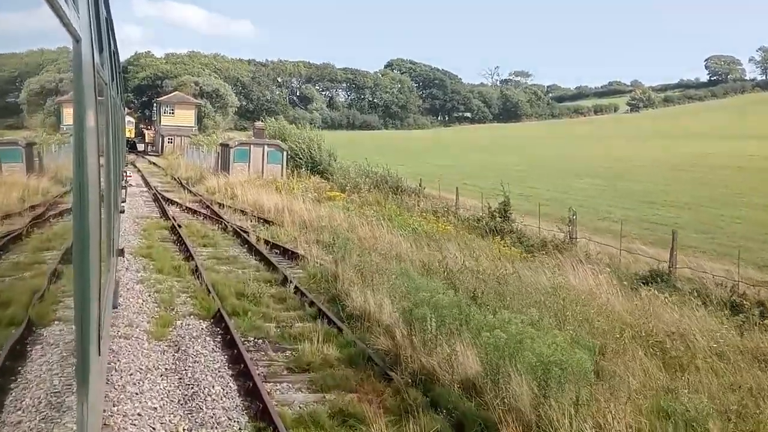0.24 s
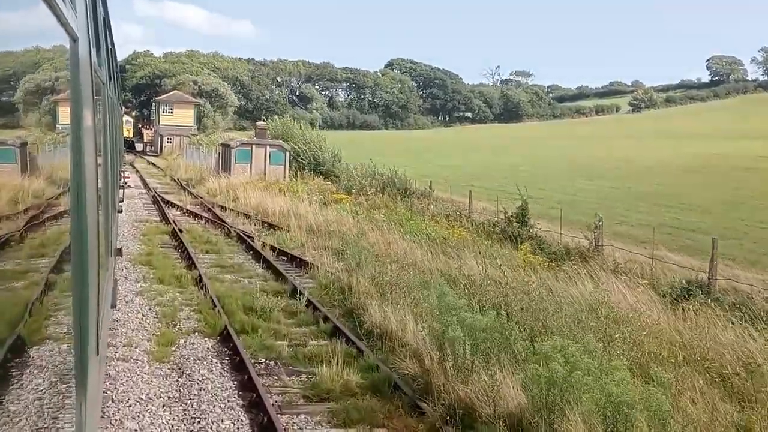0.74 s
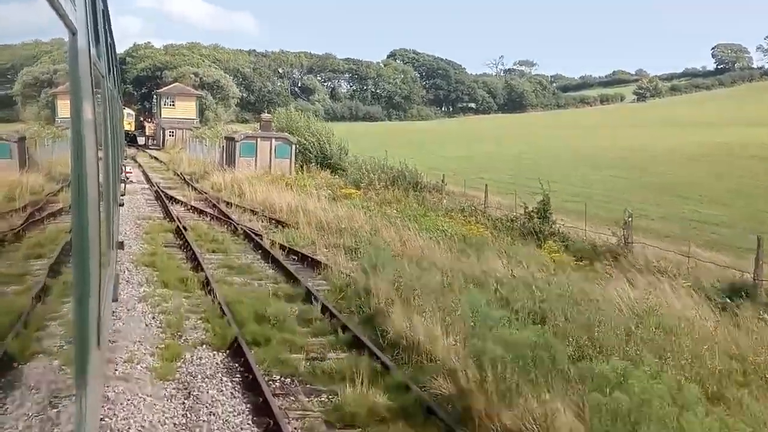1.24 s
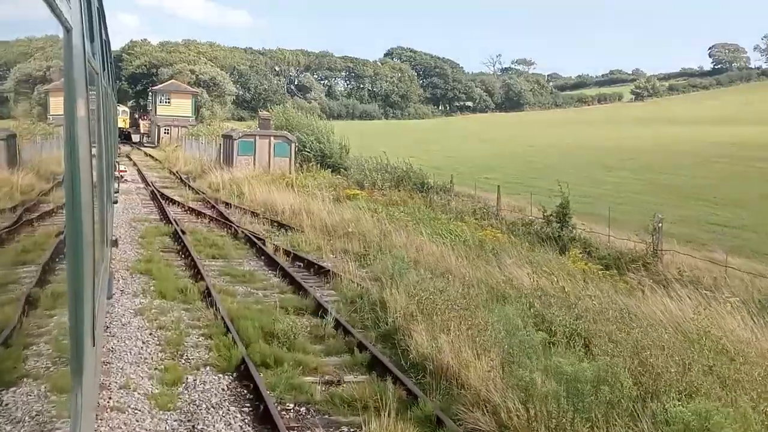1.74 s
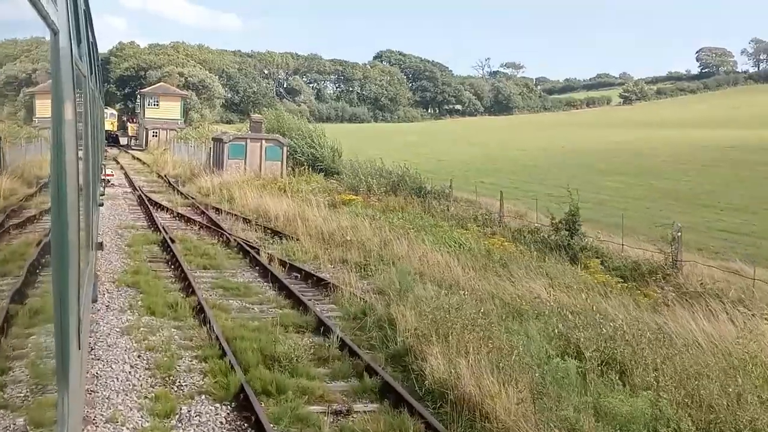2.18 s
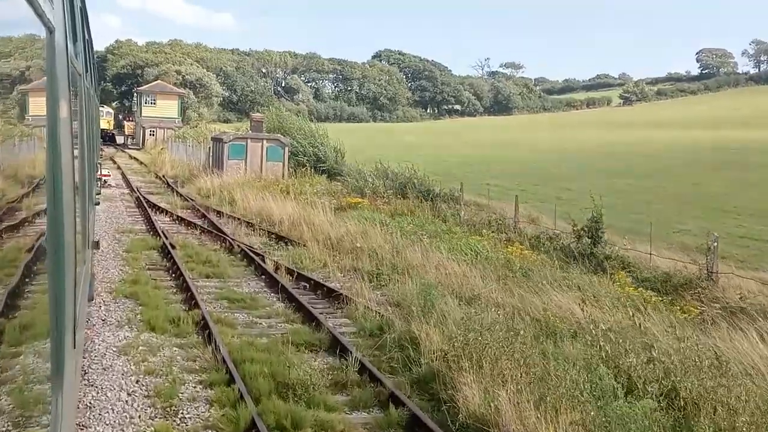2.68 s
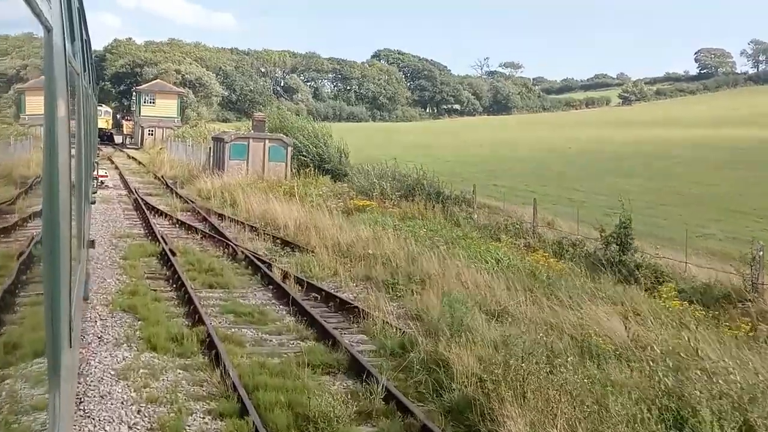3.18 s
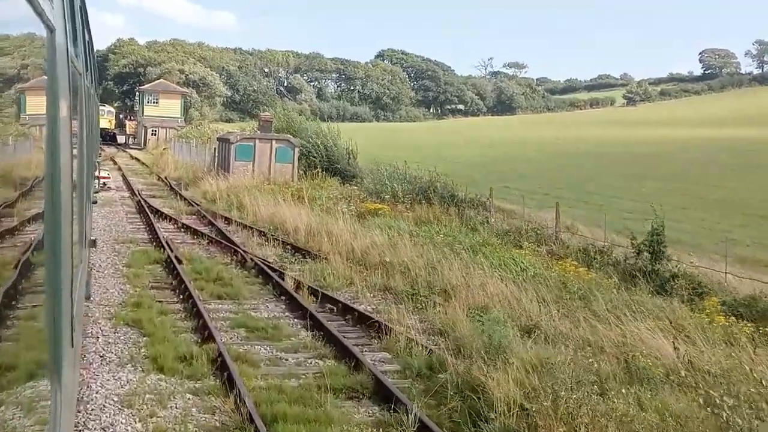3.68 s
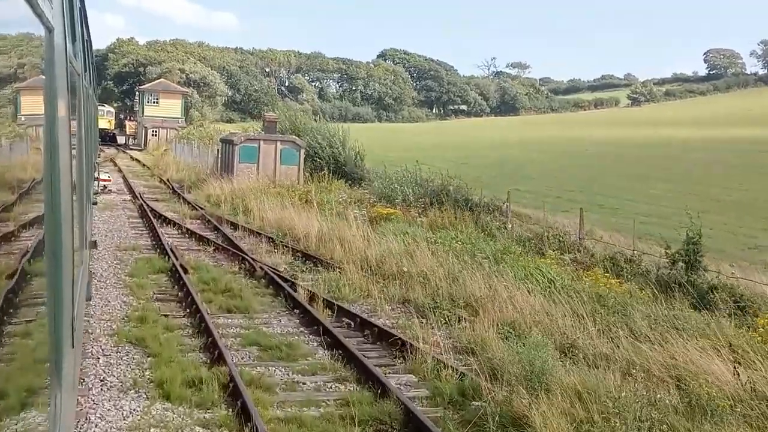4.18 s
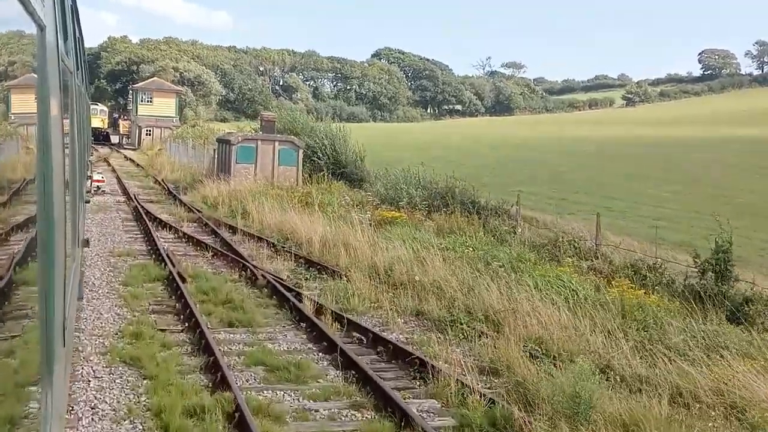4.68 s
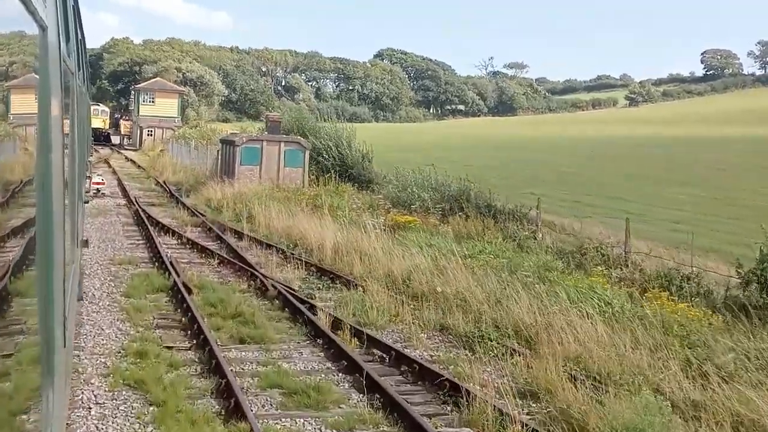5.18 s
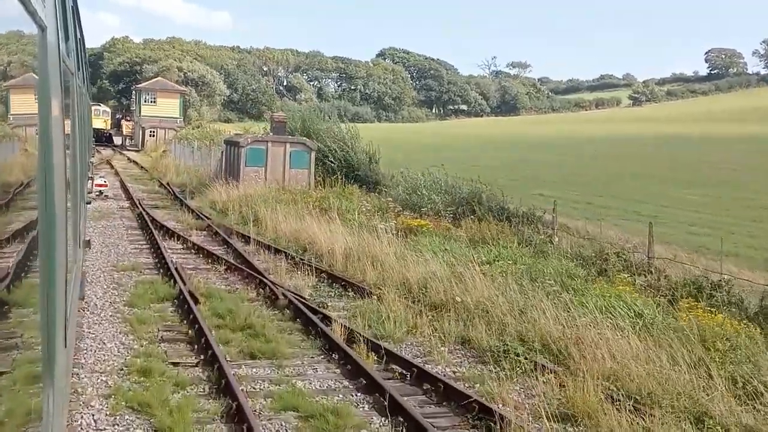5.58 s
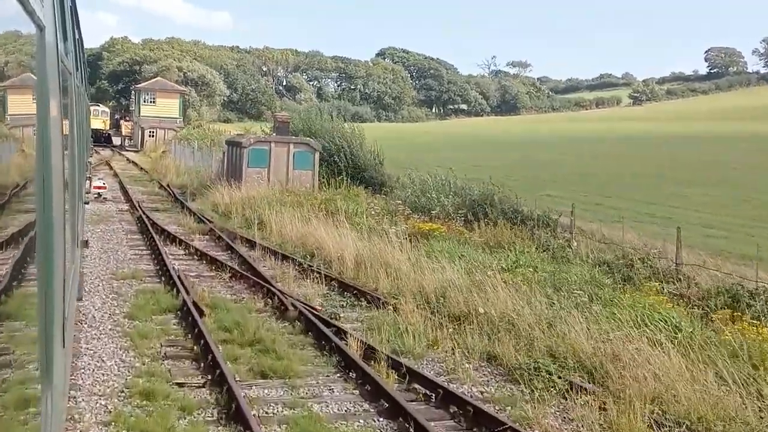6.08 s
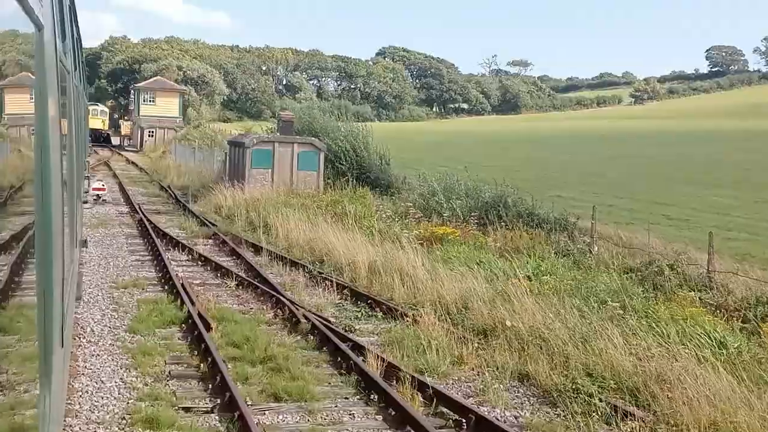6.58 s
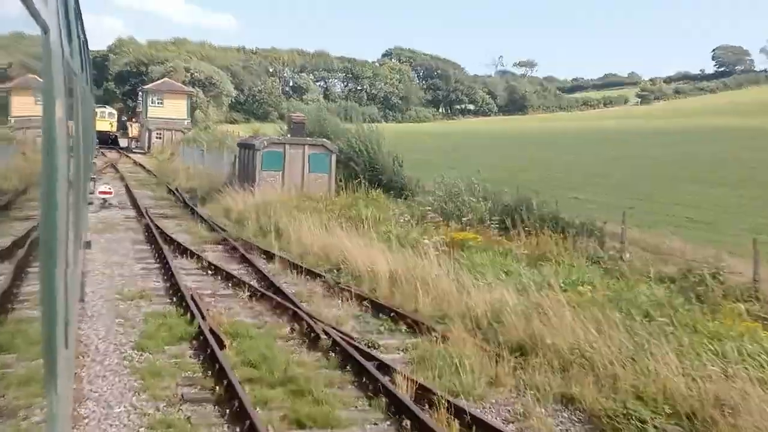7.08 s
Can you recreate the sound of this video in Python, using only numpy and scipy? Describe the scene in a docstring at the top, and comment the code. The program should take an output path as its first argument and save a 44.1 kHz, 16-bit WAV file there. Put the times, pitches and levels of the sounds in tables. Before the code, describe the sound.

A passenger coach rolls slowly on jointed rails, heard from a microphone held out of a window in the moving air. A steady rushing hiss from the wheels runs throughout, with a faint metallic ringing that flickers in short spurts. For the first two seconds the wind is a deep, moderate rumble with a few soft puffs. At about 2.4 seconds the wheels clank over a joint with a thud. Strong gusts then buffet and pop on the microphone from about 2.7 to 4.5 seconds, with another clatter at 3.5 seconds. After a brief lull, a quick cluster of clanks comes at 5.2 to 5.4 seconds as the wind surges again. A faint squeak and a lighter knock follow near 6 seconds. A last run of clatters falls between 6.6 and 6.9 seconds under heavy gusts, and the wind eases just after 7 seconds.

```python
"""Wind buffets the microphone over the hiss of wheels: a passenger coach rolling slowly on jointed
rails, heard from one microphone held out of a window, right in the slipstream. Eddies press on it
in gusts, puffs and pops above a deep rumble. From the track below, rail roughness hisses and sets
the wheels humming in their own modes; they clatter over the joints and knock, ping or squeak."""
import sys
import numpy as np
from scipy import signal
from scipy.fft import rfft, irfft, next_fast_len
from scipy.io import wavfile
from scipy.ndimage import uniform_filter1d, map_coordinates

SR = 44100
rng = np.random.default_rng(int(sys.argv[2]) if len(sys.argv) > 2 else 0)


def dump(signal):
    """Clip the signal to [-1, 1] and save it as 16-bit WAV at the path in sys.argv[1]."""
    limited = np.clip(np.atleast_2d(signal).T, -1, 1)
    pcm = np.round(limited * 32767).astype(np.int16)
    wavfile.write(sys.argv[1], SR, pcm)


N = 323681

# The wheels' running level along the track: time_s, roll_db, hiss_db, singing_offset_db
ROLLING_LEVELS = [(0, -44.5, -66.5, 2), (.9, -45, -65, 2.5), (1.7, -44, -65, 2.5), (2.8, -44.5, -67, 0.5),
                  (3.3, -43, -63.5, 1), (4.05, -44.5, -65, -0.5), (4.6, -43.5, -65, -3),
                  (5.4, -45, -66.5, 0), (6.4, -45, -64.5, 1.5), (7.34, -45.5, -66, -7)]
# The fainter wheel modes: pitch_hz, width_hz, level_db
FAINT_MODES = [(1840, 150, -59.5), (2404, 26, -65.5), (2615, 41, -65), (2766, 29, -65), (3104, 32, -64.5),
               (3460, 18, -72.5), (4330, 200, -66), (5270, 50, -76), (5740, 55, -78), (5860, 40, -86),
               (6950, 60, -81.5), (10350, 120, -78.5), (11150, 70, -83.5), (11600, 70, -88)]
# The three clearest wheel modes: pitch_hz, width_hz, level_db
SINGING_MODES = [(1353, 35, -59.5), (1994, 53, -55.5), (3800, 74, -64)]


def amp(db):
    """Gain of a level in dB."""
    return 10 ** (np.asarray(db) / 20)


def unit(x):
    """x at rms 1."""
    return x / np.sqrt(np.mean(x ** 2) + 1e-20)


def curves(rows):
    """One value per sample for each column after the time."""
    times, *columns = np.transpose(rows)
    return [np.interp(np.arange(N) / SR, times, column) for column in columns]


def wobble(rate):
    """A smooth random curve, rate knots a second."""
    knots = rng.standard_normal(int(N * rate / SR) + 4)
    return map_coordinates(knots, [np.arange(N) * rate / SR])


def filtered(x, response):
    """x through a filter whose gain is response(hz)."""
    size = next_fast_len(len(x) + 8192)
    return irfft(rfft(x, size) * response(np.fft.rfftfreq(size, 1 / SR)), size)[:len(x)]


def rush(spectrum, patchy_db, count=N):
    """Noise of rms 1 with patches of random gain, coloured by (freq_hz, level_db) points."""
    bins = signal.stft(rng.standard_normal(count + 512), nperseg=512)[2]
    patches = uniform_filter1d(rng.standard_normal(bins.shape), size=4, axis=0)
    patches = uniform_filter1d(patches, size=12, axis=1)
    noise = signal.istft(bins * amp(patchy_db * unit(patches)), nperseg=512)[1][:count]
    freq_hz, level_db = np.transpose(spectrum)
    return unit(filtered(noise, lambda f: amp(np.interp(np.log1p(f), np.log1p(freq_hz), level_db))))


def hum(hz, width_hz):
    """Noise in one narrow mode, rms 1."""
    return unit(filtered(rng.standard_normal(N), lambda f: 1 / (1 + ((f - hz) / width_hz) ** 2)))


def resonances(modes):
    """The gain of (pitch_hz, width_hz, gain_db) modes as a function of frequency."""
    return lambda f: np.sqrt(sum(amp(2 * db) / (1 + ((f - hz) / width_hz * 2) ** 2)
                                 for hz, width_hz, db in modes))


def swell(t, rise_s, t60_s):
    """A soft rise into an exponential fall, peak 1."""
    shape = (1 - np.exp(-t / max(rise_s, 1e-4))) * amp(-60 * t / max(t60_s, .005))
    return shape / shape.max()


def add(track, start_s, x):
    """Mix x into track from start_s."""
    part = track[round(start_s * SR):][:len(x)]
    part += x[:len(part)]


def humps(centres_s, lengths_s, levels_db, lean=1):
    """Summed power of rounded swells; with lean over 1 they build more slowly than they drop."""
    power = np.zeros(N)
    for centre_s, length_s, db in zip(centres_s, np.maximum(lengths_s, .02), levels_db):
        u = np.linspace(0, 1, int(length_s * SR))
        add(power, centre_s - length_s / 2, amp(2 * db) * np.sin(np.pi * u ** lean) ** 2)
    return power


def rail_hiss():
    """Wheels on rough rail, below the window: a broad rush and a high hiss that waver together."""
    # The rolling contact: freq_hz, level_db
    contact_spectrum = [(180, -2.5), (300, -2.5), (373, -12.5), (453, -0.5), (502, -5), (711, -6.5),
                        (1030, -11), (1390, -12), (1700, -14.5), (2020, -14.5), (2120, -11.5), (3740, -18),
                        (6500, -34.5), (8450, -76), (14300, -120)]
    # Its high hiss: freq_hz, level_db
    hiss_spectrum = [(3240, -18), (5500, -9), (5890, -8.5), (6170, -5), (7110, -6), (7670, -8.5),
                     (8570, -7.5), (9300, -2.5), (10000, 0), (10350, -6.5), (10800, -9), (12800, -13.5),
                     (14800, -13.5), (15300, -20.5)]
    roll_db, hiss_db, _ = curves(ROLLING_LEVELS)
    shake = wobble(6)
    contact = amp(roll_db + 0.1 * shake) * rush(contact_spectrum, patchy_db=2.0)
    hiss = amp(hiss_db + 0.34 * shake + 0.4 * wobble(9)) * rush(hiss_spectrum, patchy_db=1.6)
    return contact + hiss


def wheel_hum(spurt_s=0.08):
    """Rail roughness drives the wheel modes: the faint ones waver, the clearest sing in spurts."""
    # Flare-ups, each in the singing mode near its pitch: centre_s, pitch_hz, level_db
    spurts = [(.49, 1985, -46.5), (.59, 1985, -48), (.82, 1360, -51), (.82, 1985, -51), (.96, 1985, -46),
              (1.08, 1985, -52), (1.2, 1985, -52), (1.35, 1985, -52), (1.2, 3820, -56.5), (1.64, 1360, -48),
              (1.94, 1985, -51), (2.11, 1985, -54), (2.43, 1360, -46), (3.13, 1360, -54), (3.17, 3820, -55),
              (3.31, 1985, -49), (3.58, 1985, -43), (3.88, 3820, -54), (4.09, 1985, -51), (4.62, 1360, -55),
              (5.21, 1360, -42), (5.23, 1985, -46), (6.58, 1360, -41.5), (6.85, 1360, -46),
              (7.07, 1985, -48.5)]
    roll_db, _, singing_db = curves(ROLLING_LEVELS)
    track = np.zeros(N)
    for hz, width_hz, db in FAINT_MODES:
        waver_db = 2.2 * wobble(2.2) + 2.6 * wobble(14)
        track += amp(db + roll_db - roll_db.mean() + waver_db) * hum(hz, width_hz)
    for hz, width_hz, db in SINGING_MODES:
        own_spurts = [row for row in spurts if abs(np.log2(row[1] / hz)) < .25]
        centres_s, _, flare_db = np.transpose(own_spurts)
        flare_power = humps(centres_s, np.full(len(centres_s), spurt_s), flare_db)
        flicker = amp(db + singing_db) * unit(amp(1.9 * wobble(25) + 1.6 * wobble(8.3)))
        track += np.sqrt(flicker ** 2 + flare_power) * hum(hz, width_hz)
    return track


def rail_joints(rise_s=0.016, clank_db=-6.5, crack_db=-15.5):
    """Each gap shakes loose steel: a crack, a clatter, its clank in the wheel, a thud in the frame."""
    # A wheel over a gap: start_s, clatter_db, thud_offset_db, tilt_db_per_octave, t60_s
    gaps = [(2.4054, -41.5, 13.5, -2.5, 0.22), (2.4212, -42, -16, -3, 0.19), (3.129, -53, 4, -8, .2),
            (3.25, -50.5, -2, -10, 0.27), (3.547, -40.5, 10.5, -2, 0.17), (4.59, -53, -2, 2, .2),
            (5.1994, -40, 8.5, -2, 0.15), (5.265, -50, 13.5, 4, .14), (5.3178, -42.5, -2, -17, 0.2),
            (5.389, -53, 11.5, -17, 0.18), (5.9694, -47, -14, -4, .19), (6.57, -40.5, 5.5, -5.5, 0.2),
            (6.6394, -59, 0, -11, .16), (6.6994, -47, 0, -9, 0.52), (6.7555, -44, -15, -8, 0.47),
            (6.8234, -38.5, 10.5, -5.5, 0.15), (6.9048, -53.5, 13.5, -14, 0.39)]
    # Loose steel shaking: freq_hz, level_db
    clatter_spectrum = [(470, -33), (800, -12), (1230, -6), (1400, -6.5), (1630, -5.5), (1850, -14),
                        (2240, -9), (3740, -18.5), (8000, -44.5), (10400, -80), (17600, -120)]
    # Steel on steel at the blow: freq_hz, level_db
    crack_spectrum = [(2000, -30), (3200, 1), (6000, -7), (8500, -40)]
    # The frame under the coach: pitch_hz, width_hz, gain_db
    frame_modes = [(487, 220, -0.5), (562, 67, 7), (730, 45, 2), (900, 89, -9)]
    # The push on that frame: freq_hz, level_db
    thud_spectrum = [(300, -40), (430, -1.5), (1100, 5), (1500, -45)]
    track, t = np.zeros(N), np.arange(SR // 2) / SR
    for start_s, db, thud_db, tilt, t60_s in gaps:
        tilted = [(hz, level + tilt * np.log2(hz / 2000)) for hz, level in clatter_spectrum]
        clatter = rush(tilted, patchy_db=2.5, count=len(t))
        modes = [(hz, 1.6 * width, rng.normal(0, 3)) for hz, width, _ in FAINT_MODES + SINGING_MODES]
        clank = filtered(clatter, resonances(modes))
        thud = filtered(rush(thud_spectrum, patchy_db=1.1, count=len(t)), resonances(frame_modes))
        crack = rush(crack_spectrum, patchy_db=2.0, count=len(t))
        add(track, start_s, amp(db + crack_db) * swell(t, rise_s / 2, t60_s=.09) * crack)
        shape = swell(t, rise_s, t60_s)
        for noise, offset_db in (clatter, 0), (clank, clank_db), (thud, thud_db):
            burst = shape * noise
            burst *= np.linalg.norm(shape) / np.linalg.norm(burst)  # the blow sets the energy
            add(track, start_s, amp(db + offset_db) * burst)
    return track


def short_tones():
    """Wind pops on the microphone, and knocks, pings and squeaks from the wheels."""
    # One tone a row: start_s, level_db, pitch_hz, glide_hz_per_s, width_hz, rise_s, t60_s
    tones = [(0.02, -47, 2630, 2, 87, 0.035, 0.45), (0.45, -24.5, 238, 0, 27, 0.0018, 0.074),
             (0.48, -37, 450, -2, 40, .003, 0.11), (0.78, -44.5, 2470, 2, 39, 0.012, 0.22),
             (1.08, -68, 5860, 3, 22, 0.1, 1.6), (1.74, -33, 297, -3, 51, 0.0034, 0.073),
             (2.002, -61, 5340, 0, 54, 0.08, .7), (2.251, -65, 5360, 10, 40, .08, 1.2),
             (2.44, -62, 5350, 0, 35, .08, .8), (2.406, -20, 507, -8, 22, 0.0048, 0.061),
             (2.522, -34, 1980, -3, 47, 0.0034, 0.052), (2.862, -19.5, 462, -3, 9.4, 0.0022, 0.04),
             (3.521, -17.5, 327, 2, 13, 0.0026, 0.058), (3.883, -41, 4440, 0, 970, .001, 0.03),
             (4.11, -39.5, 3370, 0, 6.7, 0.012, 0.16), (4.175, -48, 3360, 0, 10, .01, .1),
             (4.96, -44, 2360, 20, 33, .01, 0.1), (5.199, -34, 1857, 2, 55, 0.0034, 0.15),
             (5.285, -44, 3300, 8, 220, 0.0092, 0.16), (5.88, -52, 4500, -2500, 150, 0.037, 0.42),
             (5.62, -71, 5730, 0, 27, .1, 1.5), (5.95, -38, 598, -4, 18, 0.056, 1.2),
             (6.407, -32, 505, 0, 45, .002, 0.035), (6.758, -25, 306, 3, 18, 0.0086, 0.17),
             (6.93, -49, 1022, 3, 23, 0.052, 0.94)]
    track, t = np.zeros(N), np.arange(SR // 2) / SR
    fade = np.cos(np.pi * t)  # closes long tones at half a second
    for start_s, db, hz, glide, width_hz, rise_s, t60_s in tones:
        # the phase wanders: the wider the tone, the closer to a tick or a scrape
        drift = np.cumsum(rng.normal(0, np.sqrt(2 * np.pi * abs(width_hz) / SR), len(t)))
        tone = np.sin(2 * np.pi * (hz + glide * t / 2) * t + uniform_filter1d(drift, size=12))
        add(track, start_s, amp(db) * swell(t, rise_s, t60_s) * fade * tone)
    return track


def wind_gains(fast_offset_db=-5):
    """Gains of slow eddies, fast eddies and deep rumble: the stream past the window plus its gusts."""
    # The slipstream between gusts: time_s, buffet_db, rumble_db
    stream = [(0, -43.5, -38), (.7, -42, -45.5), (1.3, -42.5, -37.5), (1.8, -41.5, -40), (2.3, -39.5, -39),
              (2.7, -35.5, -34), (3.1, -32.5, -33), (3.6, -36, -32), (4.02, -42.5, -38), (4.4, -36.5, -35),
              (4.75, -35, -37.5), (5.1, -36, -41), (5.5, -29, -32.5), (5.9, -27, -28.5), (6.22, -35.5, -43),
              (6.45, -25.5, -29.5), (6.75, -34, -31), (7.05, -37, -32), (7.34, -43, -31.5)]
    # Single gusts: centre_s, length_s, buffet_db, fast_offset_db, rumble_db
    gusts = [(0.182, 0.062, -30.5, -23, -42), (0.492, 0.14, -43, 4, -32), (0.974, 0.064, -57, -4, -35),
             (1.288, 0.074, -35, -6, -34), (1.74, .12, -43.5, 2.5, -33), (1.932, 0.092, -34.5, -22, -26.5),
             (2.107, 0.13, -40.5, -1.5, -27), (2.42, 0.11, -26, -5, -36), (2.486, 0.051, -32, -27, -46),
             (2.683, 0.06, -29, -5.5, -40), (2.816, .14, -19, -5, -23), (2.868, 0.044, -16, -6.5, -34),
             (2.922, 0.076, -30, -0.5, -38), (2.98, 0.083, -22.5, -8.5, -41),
             (3.128, .15, -21.5, -6.5, -35), (3.27, 0.12, -25, -8, -24.5), (3.386, 0.099, -28, -10, -27),
             (3.553, 0.13, -23, -0.5, -39), (3.698, 0.062, -21.5, -3.5, -31),
             (3.883, 0.053, -31.5, -18, -28.5), (4.126, 0.12, -35, -4, -31.5),
             (4.181, 0.099, -25.5, -2, -42), (4.249, 0.14, -21.5, -1, -49), (4.335, 0.12, -22.5, -9, -36),
             (4.418, 0.17, -29, -6.5, -28), (4.53, 0.049, -33, -23, -45), (5.023, 0.11, -36, -17, -28),
             (5.234, .17, -26, -2, -34), (5.377, 0.093, -22, -5, -19.5), (5.493, 0.067, -38, 4.5, -30.5),
             (5.612, 0.056, -36, -18, -39), (5.705, 0.11, -26.5, -6, -28.5), (5.933, 0.11, -23, -16, -26),
             (6.006, 0.18, -24.5, 0.5, -37), (6.328, 0.058, -25, -7.5, -27.5), (6.476, 0.18, -21, -4, -36),
             (6.575, .06, -24.5, -2.5, -33), (6.694, 0.15, -33, -2, -31), (6.84, .07, -22, 4, -34),
             (6.89, .12, -21, -4, -24.5), (7.042, 0.063, -44, 5, -32), (7.167, 0.14, -35.5, -7, -36)]
    buffet_db, rumble_db = curves(stream)
    centres_s, lengths_s, gust_db, sharp_db, boom_db = np.transpose(gusts)
    layers = [(buffet_db, gust_db),
              (buffet_db + fast_offset_db, gust_db + sharp_db),
              (rumble_db, boom_db)]
    return [np.sqrt(amp(2 * steady_db) + humps(centres_s, lengths_s, peaks_db, lean=1.135))
            for steady_db, peaks_db in layers]


def body_rumble(gain):
    """Deep, uneven noise around the boom of the coach body."""
    # The boom: freq_hz, level_db
    boom_spectrum = [(20, -39), (35, -29), (52, -18), (70, -8.5), (87, -4.5), (104, -9), (130, -20),
                     (200, -84)]
    return gain * unit(amp(0.53 * wobble(22) + 2.3 * wobble(15)) * rush(boom_spectrum, patchy_db=-0.7))


def puffs(cycles=2.4):
    """Single eddies hit the microphone, each a brief, low swing of pressure."""
    # One eddy a row: start_s, level_db, pitch_hz
    eddies = [(0.156, -23, 114), (0.449, -33, 87), (1.722, -20.5, 90), (1.91, -27.5, 78), (2.483, -17, 149),
              (2.672, -15, 191), (2.795, -8.5, 175), (2.809, -14, 129), (2.853, -13, 143),
              (2.868, -14.5, 155), (2.972, -18, 124), (3.101, -13.5, 150), (3.245, -17.5, 94.2),
              (3.294, -15, 99.6), (3.578, -9, 190), (3.694, -12, 142), (4.159, -16.5, 143),
              (4.819, -25.5, 122), (5.367, -8.5, 109.6), (5.818, -14.5, 195), (5.972, -16, 134),
              (6.308, -15.5, 217), (6.375, -12.5, 114), (6.409, -15, 194), (6.457, -10, 191),
              (6.577, -23, 121), (6.82, -14, 182), (6.845, -19, 215)]
    track = np.zeros(N)
    for start_s, db, hz in eddies:
        u = np.linspace(0, 1, int(SR * cycles / hz))
        swing = np.sin(2 * np.pi * cycles * u + rng.uniform(0, 2 * np.pi))
        add(track, start_s, amp(db) * np.sin(np.pi * u) ** 2 * swing)
    return track


def slipstream(slow_gain, fast_gain):
    """Eddies press right on the microphone; faster air adds smaller, higher ones that come in lumps."""
    # Slow eddies: freq_hz, level_db
    slow_spectrum = [(50, -66), (85, -41), (110, 0.5), (140, -1.5), (190, -4.5), (240, -18.5), (340, -31),
                     (570, -120)]
    # Fast eddies: freq_hz, level_db
    fast_spectrum = [(110, -29), (190, -3), (280, -4), (350, -9), (429, -15), (616, -25.5), (1100, -43.5),
                     (1430, -57), (2420, -120)]
    lumps = wobble(28)
    slow = unit(amp(0.59 * lumps + 0.91 * wobble(13)) * rush(slow_spectrum, patchy_db=1.0))
    fast = unit(amp(1.9 * lumps + 1.24 * wobble(60)) * rush(fast_spectrum, patchy_db=1.75))
    return slow_gain * slow + fast_gain * fast


def scene():
    """The air at the window and the wheels below reach one microphone."""
    slow_gain, fast_gain, rumble_gain = wind_gains()
    air = body_rumble(rumble_gain) + slipstream(slow_gain, fast_gain) + puffs()
    wheels = rail_hiss() + wheel_hum() + rail_joints()
    return (air + wheels + short_tones())[None]


def record(dry):
    """The microphone rolls off the deepest bass; the recorder keeps nothing above its band limit."""
    low_cut_hz, top_hz = 28, 15450
    return filtered(dry[0], lambda hz: (hz < top_hz) * (1j * hz / (1j * hz + low_cut_hz)) ** 2)[None]


dry = scene()
out = record(dry)
dump(out)
```